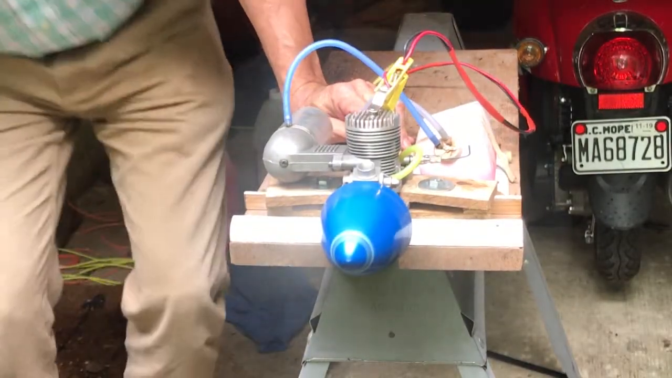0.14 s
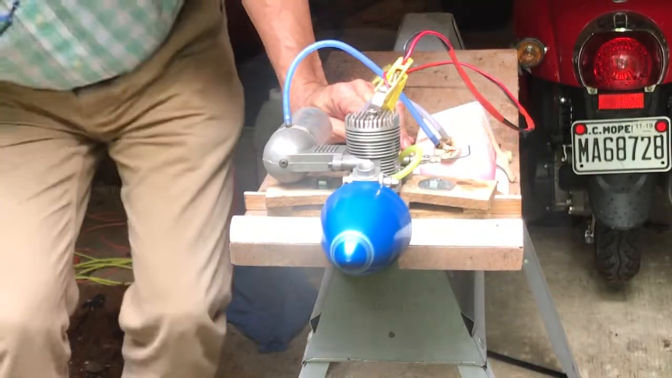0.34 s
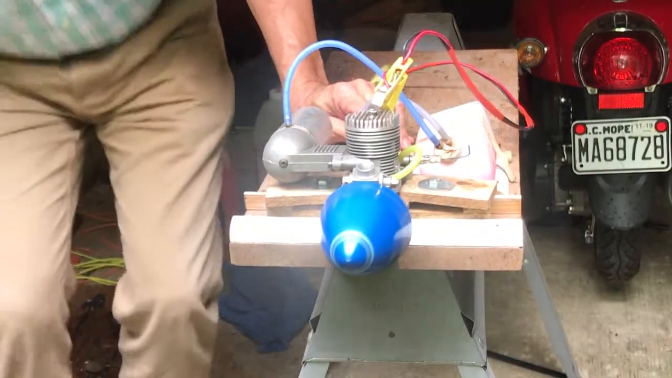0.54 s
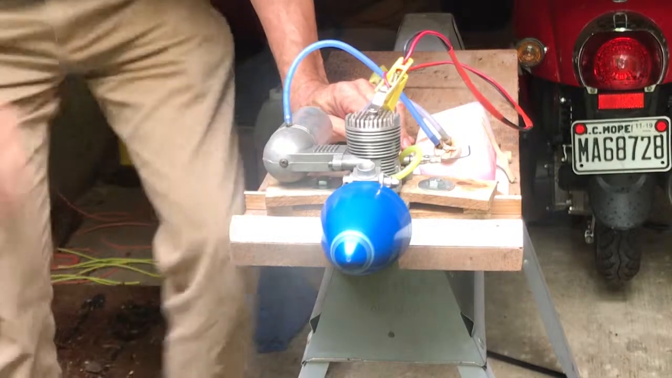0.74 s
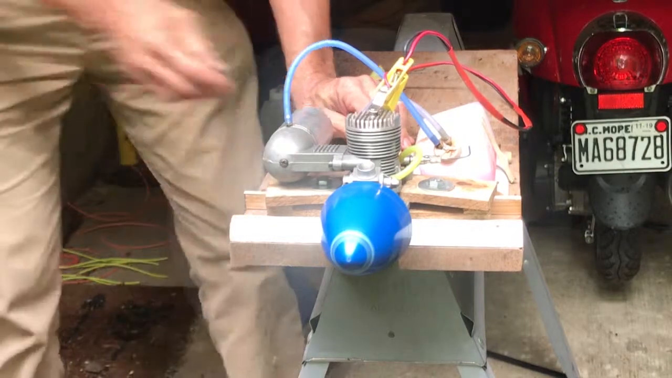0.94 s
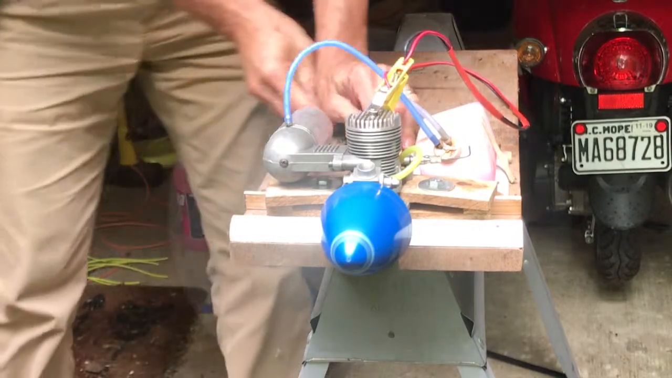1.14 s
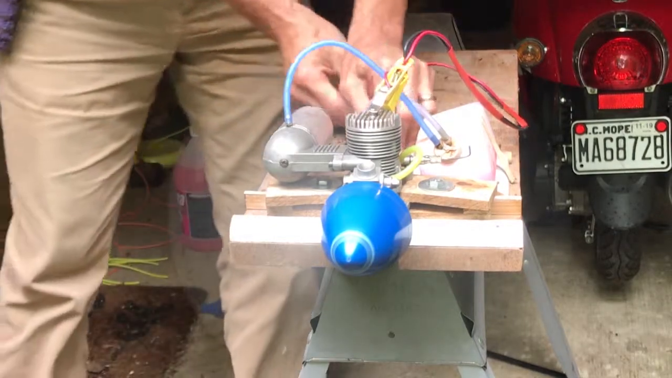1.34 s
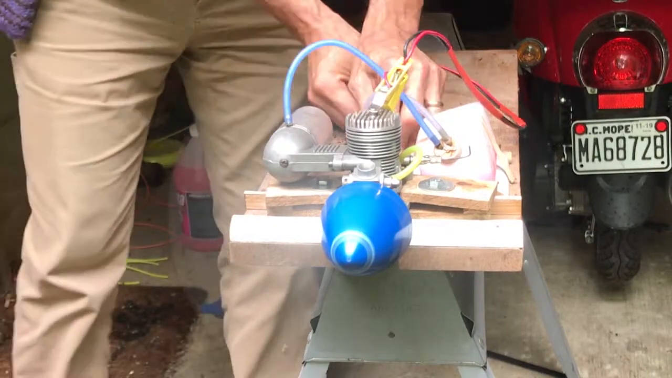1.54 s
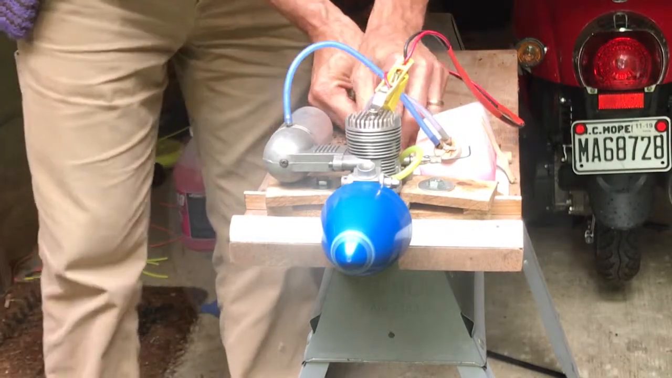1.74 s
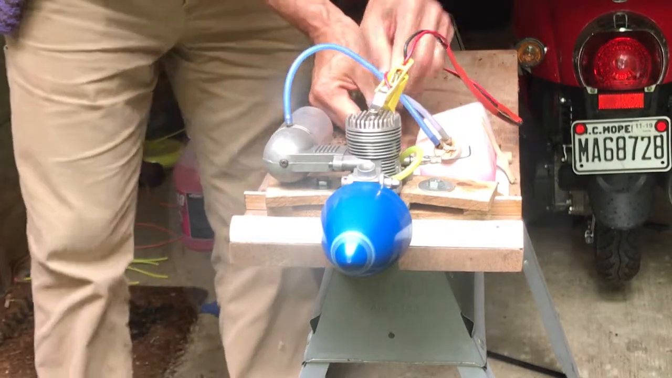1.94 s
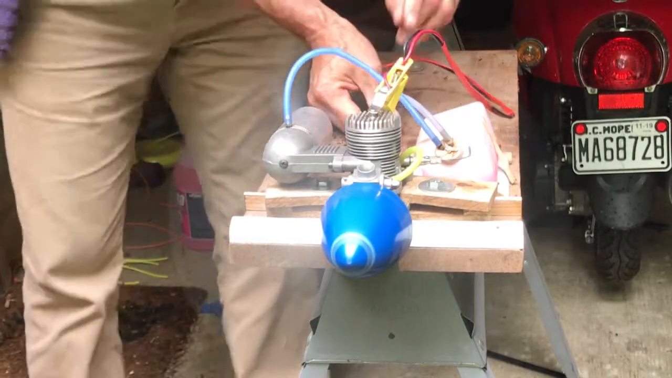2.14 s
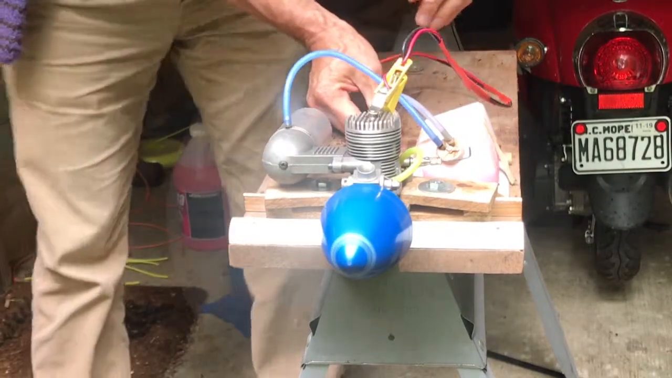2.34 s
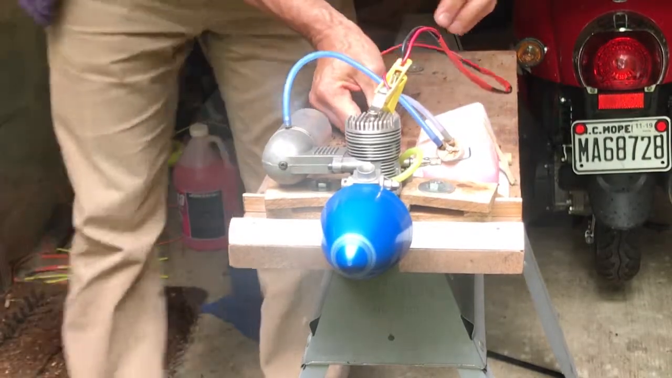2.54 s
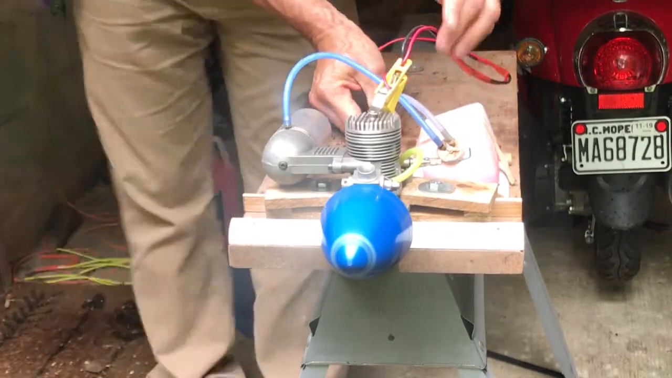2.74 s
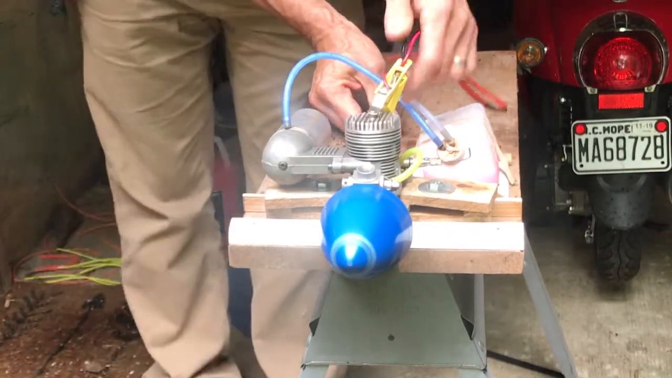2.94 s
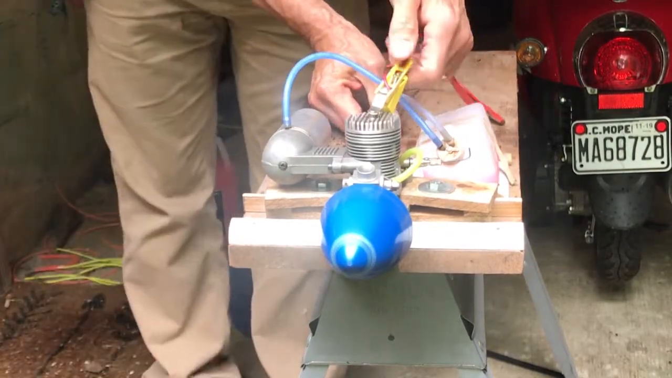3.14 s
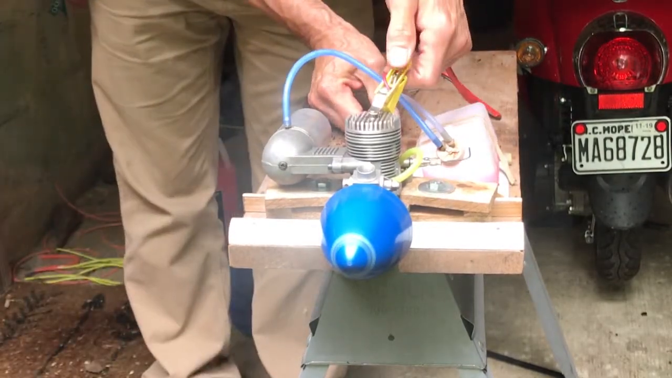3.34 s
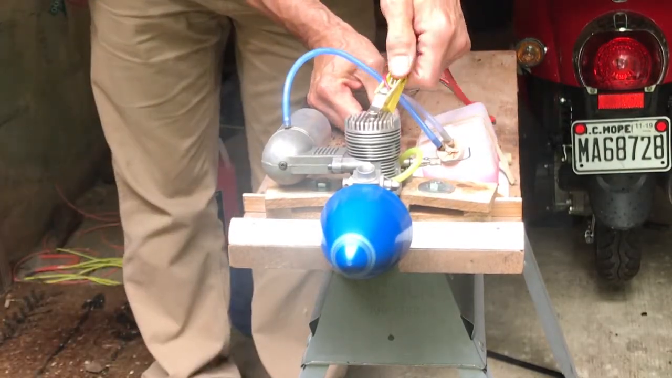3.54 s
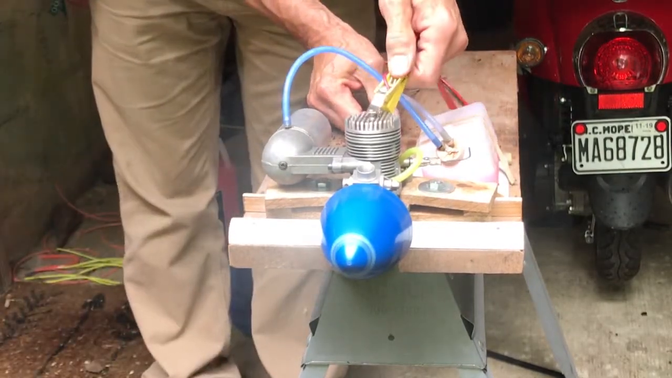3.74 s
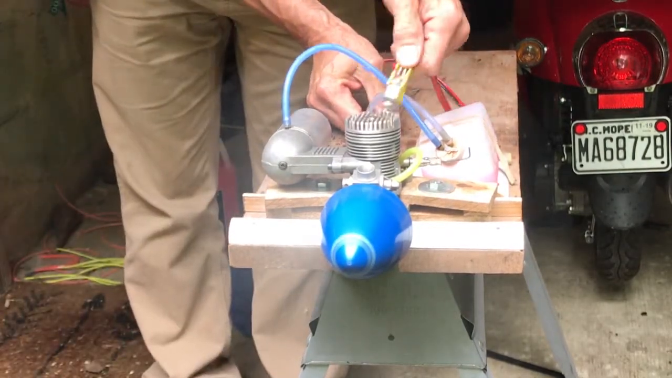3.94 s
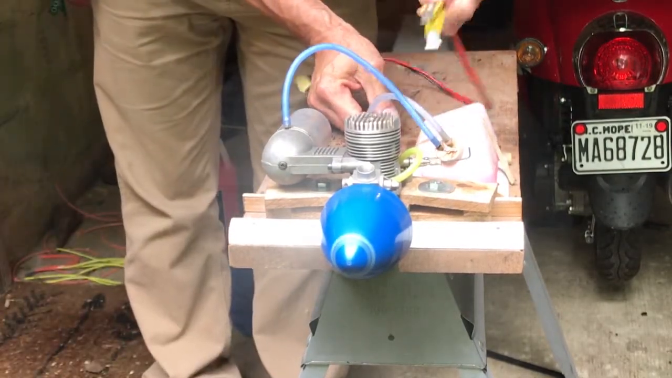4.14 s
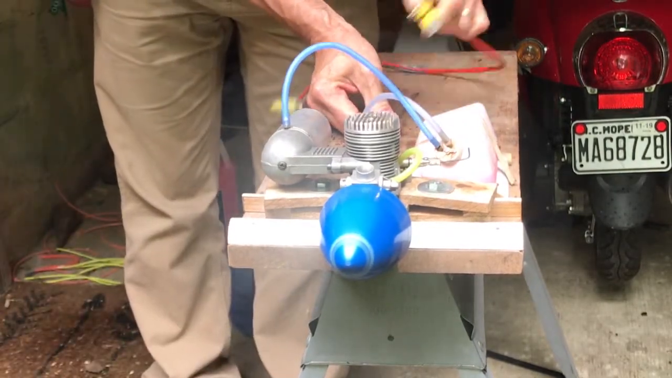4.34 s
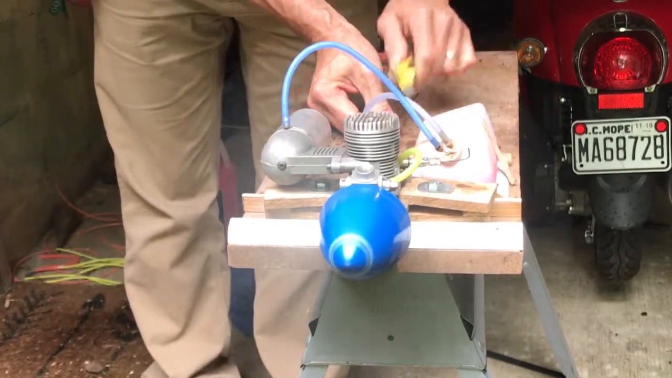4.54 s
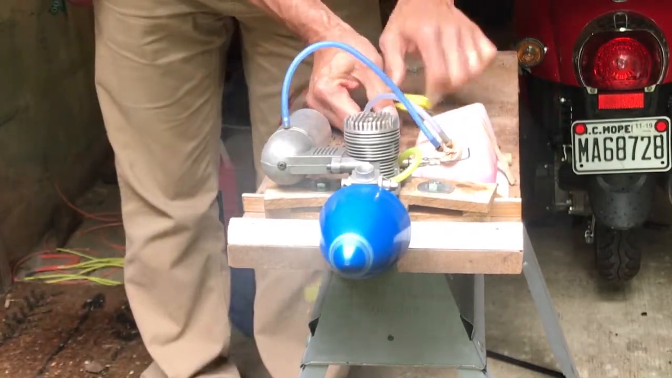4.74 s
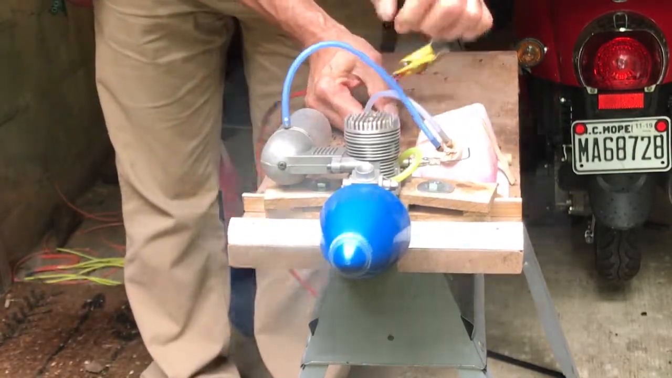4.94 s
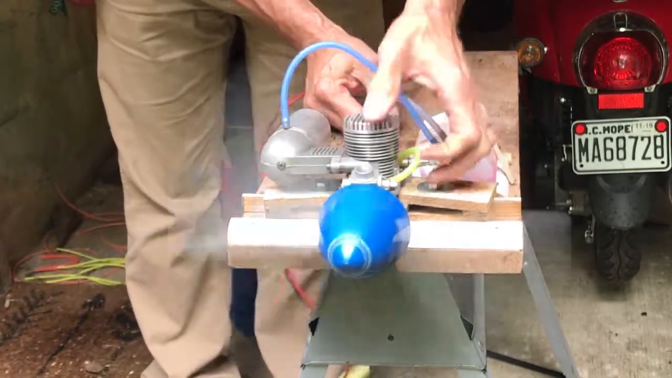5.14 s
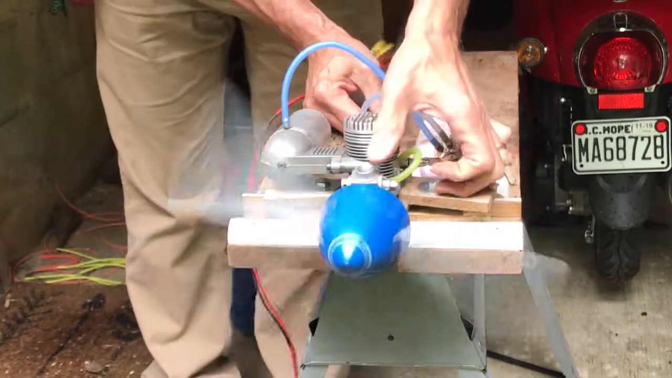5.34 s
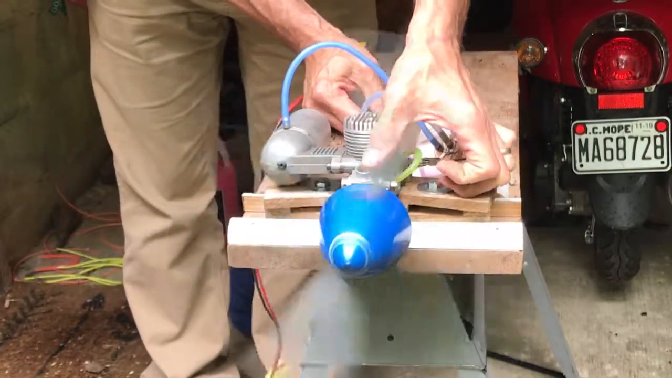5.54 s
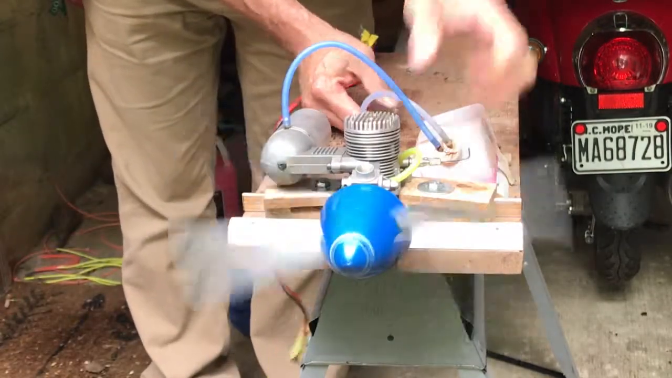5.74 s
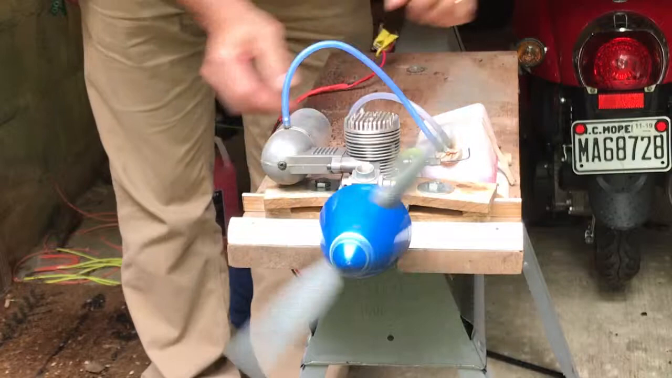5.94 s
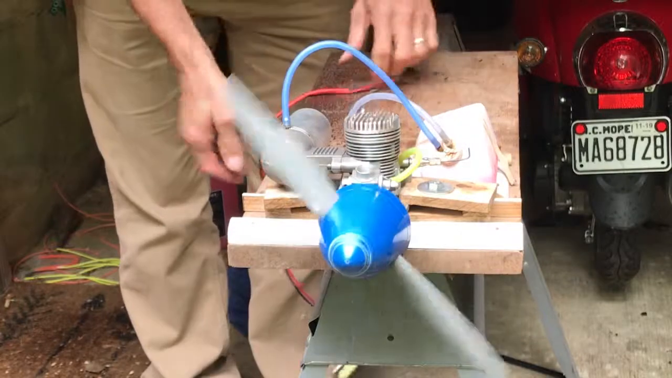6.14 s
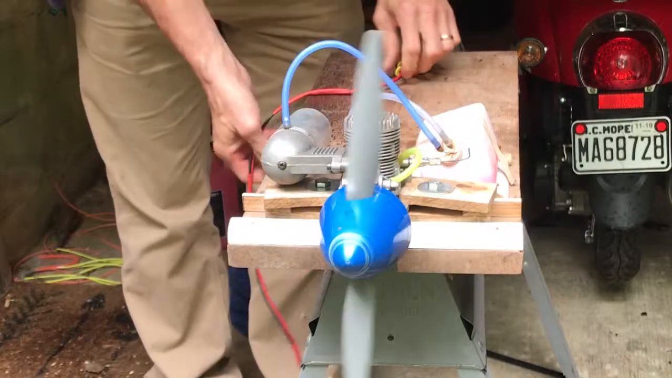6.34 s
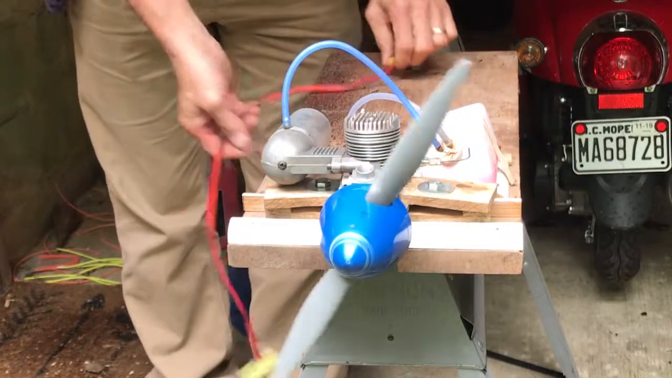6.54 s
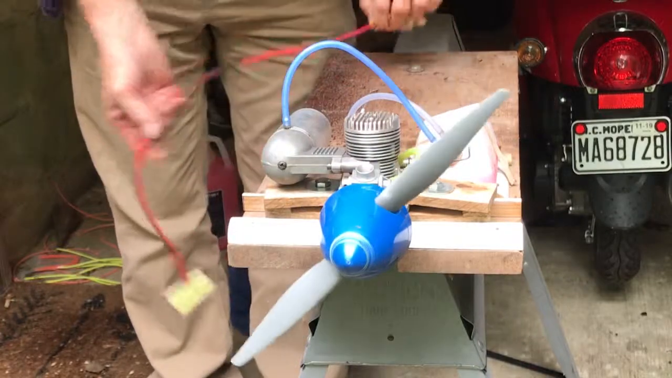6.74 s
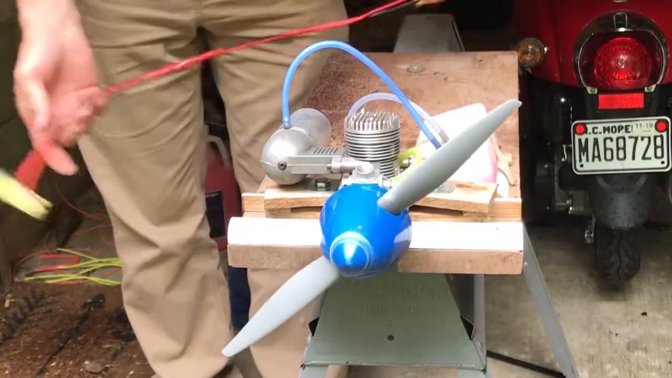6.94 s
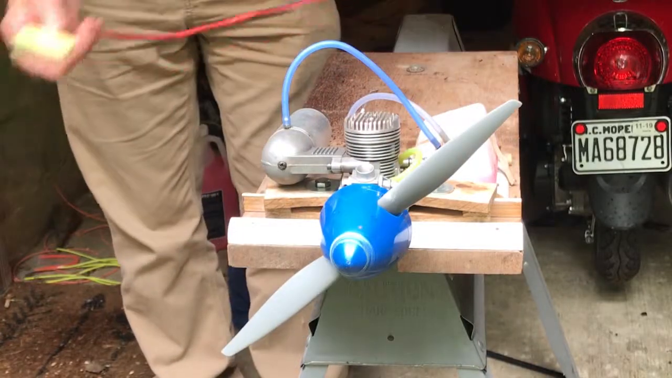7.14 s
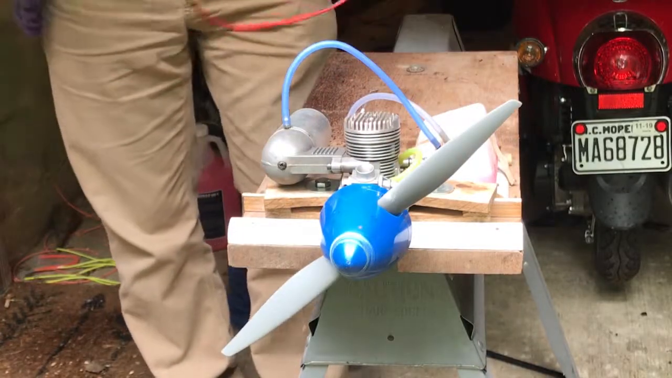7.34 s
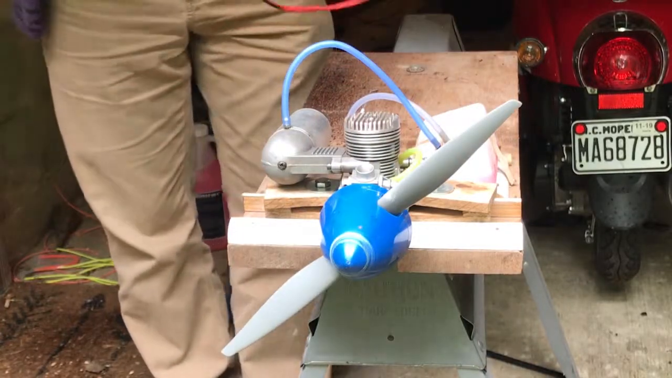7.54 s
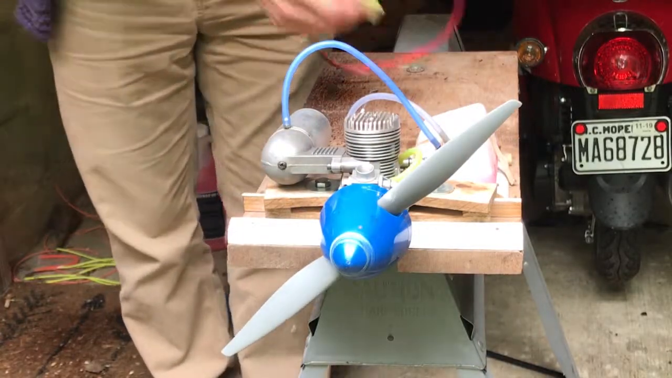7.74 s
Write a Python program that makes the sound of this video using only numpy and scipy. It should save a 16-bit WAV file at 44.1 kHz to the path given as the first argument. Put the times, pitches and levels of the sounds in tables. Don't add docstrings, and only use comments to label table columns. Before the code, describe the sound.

A tiny two-stroke propeller engine on a wooden stand runs loud and close at a garage door. Its raspy buzz holds with two early taps, climbs to a hissing whine, then slides down and loses fire. Breathy gasps and slowing compression thumps follow as it coasts to a stop. Clip and wire tick, something knocks on wood, cloth rustles, and faint birds chirp outside.

```python
import sys
import numpy as np
from scipy import signal
from scipy.fft import rfft, irfft
from scipy.io import wavfile
from scipy.ndimage import uniform_filter1d

SR = 44100
rng = np.random.default_rng(int(sys.argv[2]) if len(sys.argv) > 2 else 0)


def log_audio(samples):
    frames = np.atleast_2d(samples).T
    limited = np.clip(frames, -1, 1)
    pcm = np.round(limited * 32767).astype(np.int16)
    wavfile.write(sys.argv[1], SR, pcm)


def ratio(d):
    e = np.asarray(d, float) / 20
    return 10 ** e


N = 347508
T = np.arange(N) / SR


def evened(x, span=None):
    power = uniform_filter1d(x ** 2, span) if span else np.mean(x ** 2)
    return x / np.sqrt(abs(power) + 1e-20)


def curves(rows):
    s, *columns = np.transpose(rows)
    return [np.interp(T, s, c) for c in columns]


def read(points, hz):
    f, value = np.transpose(points)
    return np.interp(np.log(hz + 1), np.log(f + 1), value)


def add(mix, s, sound):
    part = mix[round(s * SR):][:len(sound)]
    part += sound[:len(part)]


def resonate(x, hz, width):
    turn = np.exp(2j * np.pi * np.cumsum(hz * np.ones(len(x))) / SR)
    r = np.exp(-np.pi * abs(width) / SR)
    return 2 * (turn * signal.lfilter([1 - r], [1, -r], x * turn.conj())).real


def body(x, modes, lift=0.936, dull_db=0.):
    out = 0
    for k, (hz, width, db) in enumerate(modes):
        gain = ratio(db - dull_db * np.log2(hz / 500))
        out = out + (-1) ** k * gain * resonate(x, hz * lift, width)
    return out


def band(x, hz, octaves):
    f = np.fft.rfftfreq(len(x), 1 / SR) + 1
    bell = np.exp(-.5 * (np.log2(f / hz) / octaves) ** 2)
    return evened(irfft(rfft(x) * bell, len(x)))


def highpass(x, hz):
    return signal.sosfilt(signal.butter(4, hz, "high", fs=SR, output="sos"), x)


def split(x, low_hz, high_hz):
    f, z = np.fft.rfftfreq(N, 1 / SR), rfft(x)
    low = 1 / (1 + (f / low_hz) ** 16)
    high = 1 / (1 + (high_hz / (f + 1)) ** 16)
    z *= f < 15850
    return [irfft(z * share, N) for share in (low, 1 - low - high, high)]


def garage(x, wet_db):
    # [f/Hz, t60/s]
    decay = [(200, 0.33), (700, 0.26), (1800, 0.11), (5000, 0.11), (12000, 0.027)]
    taps = np.zeros(SR // 2)
    at = np.arange(150, len(taps) - 20, 20)
    taps[at + rng.integers(0, 20, len(at))] = rng.choice([-1., 1.], len(at))
    hz, t, z = signal.stft(taps, SR, nperseg=256)
    fade = ratio(-60 * t / read(decay, hz)[:, None])
    tail = signal.istft(z * fade, SR, nperseg=256)[1]
    return x + ratio(wet_db) * signal.oaconvolve(x, tail / np.linalg.norm(tail))[:N]


def air():
    # [f/Hz, level/dB per Hz]
    colour = [(14, -40.5), (24, -15.5), (65, 2), (193, -17), (513, -27), (976, -26), (2140, -32.5),
              (2750, -28), (2990, -36.5), (3250, -29), (7730, -41), (14700, -41.5), (16000, -52)]
    level_db = -60
    frames, hz = N // 256 + 5, np.fft.rfftfreq(1024, 1 / SR)
    a, b, patches = rng.standard_normal((frames, 513, 3)).T
    patches = evened(uniform_filter1d(uniform_filter1d(patches, 12, 0), 14, 1))
    z = (a + 1j * b) * ratio(read(colour, hz)[:, None] + 1.5 * patches)
    return ratio(level_db) * evened(signal.istft(z, nperseg=1024, noverlap=768)[1][:N])


def birds():
    # [t/s, length/s, start f/Hz, end f/Hz, level/dB]
    calls = [
        (6.58, .2, 2740, 2780, -79),
        (6.95, .03, 3050, 3250, -73),
        (6.97, .13, 2640, 2760, -72),
        (7.08, .035, 3100, 3280, -75),
        (7.205, .05, 3180, 3270, -75),
        (7.33, .04, 3050, 3290, -72),
        (7.39, .1, 2650, 2720, -77),
        (7.46, .07, 3270, 3330, -73),
        (7.7, .04, 7000, 7300, -80),
        (7.81, .05, 4500, 4650, -78),
    ]
    out = np.zeros(N)
    for s, length, from_hz, to_hz, db in calls:
        n = round(length * SR)
        waver = 18 * evened(uniform_filter1d(rng.standard_normal(n), 200))
        hz = np.linspace(from_hz, to_hz, n) + waver
        whistle = np.sin(2 * np.pi * np.cumsum(hz) / SR)
        add(out, s, ratio(db) * whistle * signal.windows.tukey(n, .5))
    return ratio(2) * garage(out, -7)


def rustles():
    # [t/s, length/s, level/dB, centre f/Hz, width/octaves]
    slides = [(5.077, 0.041, -40, 2160, 0.47), (5.158, 0.04, -59, 6000, 1), (5.952, .26, -67.5, 1000, 0.98),
              (5.442, 0.045, -62, 6000, .7), (5.685, .03, -67, 8000, .6), (5.944, 0.13, -64, 3500, 0.76),
              (6.554, .1, -76.5, 3920, 1), (6.746, 0.27, -65.5, 6730, 1.4), (7.097, 0.082, -64, 8000, 2.5),
              (7.332, 0.22, -68, 3860, 0.79), (7.55, 0.11, -77, 4000, 1.1), (7.795, 0.14, -73.5, 9140, 1.6)]
    out = np.zeros(N)
    for s, length, db, hz, octaves in slides:
        n = round(length * SR)
        grit = rng.standard_normal((2, 12000))
        patchy = band(grit[0], hz, octaves) * ratio(1.8 * evened(uniform_filter1d(grit[1], 300)))
        add(out, s, ratio(db) * patchy[:n] * np.hanning(n))
    return out


def ticks_and_taps():
    # [t/s, peak level/dB, centre f/Hz]
    ticks = [(5.1344, -45, 6260), (5.155, -39, 6510), (5.4065, -43, 5800), (5.4464, -54, 6000),
             (5.2194, -46, 5430), (5.2719, -51, 8800), (5.3066, -47, 8590), (5.34, -54, 8800),
             (5.3787, -38.5, 5360), (5.425, -45.5, 5840), (5.5238, -50, 5380), (5.677, -44, 7000),
             (6.0206, -44.5, 5680), (6.1816, -43.5, 6360), (6.3594, -61.5, 5300), (6.6385, -42.5, 5360),
             (6.7187, -56.5, 6880), (6.982, -57, 6500), (7.1994, -60.5, 9100), (7.366, -56, 5350),
             (7.7033, -61, 7170)]
    # [t/s, peak level/dB, centre f/Hz, width/octaves]
    taps = [(.655, -16.5, 520, 0.82), (.692, -11, 635, 2.4), (5.1385, -26, 905, 0.26),
            (5.243, -31.5, 1460, 0.34), (5.4144, -36, 864, 0.78), (5.596, -45, 900, 0.63),
            (5.446, -36, 1020, .65), (5.474, -38, 2680, 0.46), (5.9675, -37.5, 2590, 1.1),
            (5.979, -41, 2300, 0.74), (6.181, -44.5, 600, 0.61), (6.442, -50, 1870, .6),
            (6.569, -53, 2710, 1.1), (7.5941, -50, 920, 1.3), (7.6084, -44, 1840, 1.35),
            (7.7725, -53.5, 1220, 2.4), (7.8754, -42, 1116, 0.57)]
    snap_s = .0035
    out, t = np.zeros(N), T[:12000]
    hits = [(*row, 0.78, 0.27, -18.5) for row in ticks] + [(*row, 0.17, -4.5) for row in taps]
    for (s, db, hz, octaves, t60, tail_db), grit in zip(hits, rng.standard_normal((40, 12000))):
        fade = np.exp(-t / snap_s) + ratio(tail_db - 60 * t / t60)
        add(out, s, ratio(db - 11) * band(grit, hz, octaves) * fade)
    return out


def clip_knock():
    # [t/s, peak level/dB]
    blows = [
        (6.288, -21.5),
    ]
    # [f/Hz, level/dB, t60/s]
    knock_modes = [(413, -12.5, .3), (553, -14, 1.8), (690, -11, .1), (570, -27, .3), (1024, 3, 0.16),
                   (1640, 5, 0.04), (1870, 1, 0.24), (2400, 3, 0.047), (2990, 15.5, 0.011),
                   (3420, -16.5, 0.1), (3770, -26.5, 0.094), (4570, -7, 0.13), (5039, -18, 0.1)]
    out, t = np.zeros(N), T[:12000]
    modes = np.zeros(len(t))
    for hz, db, t60 in knock_modes:
        damped_t60 = .24 if hz < 600 else min(t60, .04)
        modes += ratio(db - 60 * t / damped_t60) * np.sin(2 * np.pi * hz * t)
    crack = band(rng.standard_normal(12000), 2400, .65) * (np.exp(-t / .002) + ratio(-10 - 60 * t / .19))
    strike = (modes + 1.6 * crack) * (1 - np.exp(-t / .0003))
    s, peak_db = blows[0]
    for delay, db in [(0, -11), (.0035, -3)]:
        add(out, s + delay, ratio(peak_db + db - 13) * strike)
    return garage(out, -8.0)


def coasting():
    # [t/s, peak level/dB, length/s]
    gasp_rows = [(4.726, -26, 0.008), (4.746, -22, 0.0086), (4.769, -15, 0.0071), (4.791, -19, 0.01),
                 (4.818, -18, 0.009), (4.843, -20, 0.014), (4.872, -20, 0.015), (4.908, -21.5, 0.015),
                 (4.945, -30, 0.012), (4.977, -34, 0.0097), (5.015, -51, 0.016), (5.062, -58, 0.022),
                 (5.153, -44, 0.042)]
    # [t/s, peak level/dB,
    # f/Hz, ring of the stand/dB]
    thump_rows = [(0.691, -21.5, 225, -23), (4.643, -31, 260, -27), (4.68, -30, 250, -25),
                  (4.696, -30, 262, -25), (4.717, -23, 280, -27), (4.761, -27, 230, -28),
                  (4.785, -33, 250, -25), (4.809, -30, 250, -25), (4.836, -28, 250, -23),
                  (4.866, -27, 264, -28), (4.896, -27, 259, -26), (4.932, -29, 264, -26),
                  (4.973, -29, 247, -26), (5.026, -32, 235, -10), (5.101, -35, 175, -23),
                  (5.178, -38, 200, -13), (5.258, -37.5, 257, -10.5), (5.353, -36, 233, -23),
                  (5.459, -38, 205, -7), (5.595, -43.5, 197, -14), (5.747, -45.5, 199, -11),
                  (5.942, -48, 192, -12.5)]
    # [f/Hz, width/Hz, level/dB]
    venturi = [(6200, 350, 2), (7900, 500, 0), (11800, 1500, -3), (9500, 5000, -13)]
    push_s = .0034
    gasps, out, t = np.zeros(N), np.zeros(N), T[:12000]
    shake = evened(body(rng.standard_normal(N), [(575, 25, -1.5), (905, 65, -11.5)]))
    for s, db, length in gasp_rows:
        add(gasps, s, ratio(db - 7.5) * np.hanning(round(length * SR)))
    for s, db, hz, ring_db in thump_rows:
        push = t / push_s * np.exp(1 - t / push_s) * np.sin(2 * np.pi * hz * t)
        swell = ratio(ring_db - 60 * t / 0.49) * (1 - np.exp(-t / 0.0043))
        ring = swell * shake[round(s * SR):][:len(t)]
        add(out, s, ratio(db) * (push + ring))
    return garage(out + gasps * evened(body(rng.standard_normal(N), venturi)), -20)


def controls():
    # [t/s, speed/turns per s]
    shaft = [(0.0, 112.6), (0.58, 119.0), (0.91, 117.2), (1.1, 122.2), (1.34, 111.2), (1.43, 109.2),
             (1.65, 108.5), (1.74, 118.7), (2.13, 159.7), (2.23, 165.8), (2.64, 173.3), (2.88, 173.7),
             (3.22, 162.9), (3.99, 117.1), (4.22, 101.9), (4.31, 92.1), (4.44, 84.1), (4.5, 85.0)]
    # [t/s, level/dB, dulling of the gas hiss as the mixture richens or starves/dB]
    loudness = [(0, -23, 1), (1.2, -24.5, -0.5), (1.74, -22, 1.5), (2.2, -25, -5), (2.52, -26.5, -2.5),
                (2.9, -24.5, -1.5), (3.36, -26, -3.5), (3.42, -27.5, -1.5), (3.53, -25, -3.5),
                (3.65, -26, -1), (4.2, -27.5, 0.5), (4.51, -24.5, 4.5), (4.7, -27, 6.5), (4.94, -30, 11.5),
                (5.05, -35, 20), (5.15, -48, 18.5), (5.37, -58, 27), (6, -69.5, 43)]
    # [t/s, firing/0-1]
    burn = [(0, 1), (1.6, 1), (2.6, 1), (3.6, 1), (4.1, .97), (4.3, .83), (4.45, .93), (4.52, .88),
            (4.56, .2), (4.63, 0)]
    # [t/s, length/s, rise/dB]
    drags = [
        (5.12, 0.18, 7.5),
        (5.366, 0.18, 7.5),
        (5.522, 0.036, 5),
        (5.677, 0.078, 11),
    ]
    surge_db = [.4, .9, 1.3]
    coast_s = .42
    out_s = shaft[-1][0]
    speed = uniform_filter1d(curves(shaft)[0], size=2500) * np.exp(-np.maximum(T - out_s, 0) / coast_s)
    level_db, dull_db = curves(loudness)
    surge = evened(uniform_filter1d(uniform_filter1d(rng.standard_normal(N), 1500), 1500))
    for s, length, db in drags:
        add(level_db, s, db * signal.windows.tukey(round(length * SR), .7))
    ring_db = level_db - 1 - 0.54 * dull_db
    layers_db = [level_db, ring_db, level_db - dull_db]
    return speed, curves(burn)[0], [db + depth * surge for db, depth in zip(layers_db, surge_db)]


def pulses(turns, speed):
    strokes = [(0, 0.32, 0.0032), (0.075, -0.68, 0.015), (0.142, 0.7, 0.012), (0.293, 0.063, .006),
               (.5, 0.51, 0.0085), (0.639, -0.68, .006), (0.812, 0.71, 0.019)]
    steps = []
    for (at, strength, wander), start in zip(strokes, rng.random(len(strokes))):
        drift = wander * np.sin(2 * np.pi * (start + T * (.2 + .3 * start)))
        z = np.exp(2j * np.pi * (turns - at - drift) - speed / 4000)
        steps.append(strength * (z ** 4 / (1 - z)).real)
    return np.array(steps) * np.sqrt(4 * speed / SR / np.sum(np.transpose(strokes)[1] ** 2))


def chamber(port, turns, levels_db):
    # f/Hz, width/Hz, level under the bark/dB, gain/dB per dB of dulling
    first_mode = (1247.5, 167, -1.5, 0.5)
    # [t/s, length/s, f/Hz, level/dB]
    flares = [(0, .2, 2920, -31), (.15, 1.15, 1185, -29), (.85, .45, 1190, -29), (0, 1.3, 945, -38),
              (.6, .6, 1660, -33), (1.3, .65, 545, -29), (4.26, .1, 1230, -29), (.1, 1.2, 1295, -28),
              (2.2, 1, 2380, -32), (.2, 1, 2960, -35), (1.85, .2, 1540, -29), (0, .4, 5470, -29),
              (.2, .7, 5475, -30), (.76, .48, 5500, -28), (1.26, .3, 5360, -30), (1.1, .6, 4150, -35),
              (1.17, .45, 2855, -29), (1.8, .55, 3070, -25), (2.2, 1, 3110, -29), (3.1, .65, 3070, -31),
              (1.75, .4, 4370, -33), (2.08, 1, 4500, -34), (2.15, 1.2, 4640, -36), (3.25, .65, 4360, -35),
              (1.6, .6, 5700, -35), (2.08, .5, 5820, -32), (2.3, .8, 5900, -36), (2.15, 1.2, 6060, -36),
              (2.9, .5, 5790, -33), (3.3, .55, 5680, -31), (3.7, .45, 5560, -36), (1.8, 1.1, 7170, -35),
              (1.75, 1.1, 8490, -34), (3, .7, 8420, -38)]
    hz, width, db, gain_db = first_mode
    ring = evened(resonate(resonate(port, hz, width), hz, 2 * width), 6000)
    out = ring * ratio(levels_db[0] + db + gain_db * np.clip(levels_db[0] - levels_db[2], -6, 4))
    z = .99 * np.exp(2j * np.pi * turns)
    beat = (z / (1 - z)).real
    for s, length, hz, db in flares:
        part = beat[round(max(s, 0) * SR):][:round(length * SR)]
        width = 20 + hz / 70
        flare = evened(resonate(resonate(part, hz, width), hz, width), 9000)
        add(out, max(s, 0), ratio(db) * flare * signal.windows.tukey(len(part), .5))
    return out


def clean_orders(speed, turns, late):
    # [f/Hz, level/dB]
    shaft_tone, blade_tone = [(55, -47), (85, -49), (107, -35), (114.5, -43.5), (120, -39), (145, -29.5),
                              (162, -53), (171, -41.5)], [(120, -38.5), (170, -27.5), (185, -39.5), (217, -28.5),
                                                  (230, -33), (243, -26), (325, -30.5), (345, -22.5)]
    blow_tone, port_tone = [(200, -42), (255, -24), (330, -38), (364, -45.5), (410, -37.5), (480, -45.5),
                            (505, -52.5), (520, -34.5)], [(400, -38.5), (470, -71), (545, -45), (600, -51.5),
                                               (690, -47.5), (750, -44.5), (830, -39), (870, -46.5)]
    pull_gains = [0.027, 0.0315, 0.084, .01, 0.013]
    # [multiple of the shaft, level/dB]
    whine = [
        (7, -42),
        (14, -27.5),
    ]
    pull = np.clip(uniform_filter1d(np.gradient(speed) * SR, 8000), -60, 120)
    still_db = -3 * np.maximum(43 - speed, 0)
    out = np.zeros(N)
    tones = [shaft_tone, blade_tone, blow_tone, port_tone, port_tone]
    for k, (tone, pull_db) in enumerate(zip(tones, pull_gains), 1):
        db = read(tone, k * speed) + pull_db * pull + still_db
        out += np.sqrt(2) * ratio(db) * np.cos(2 * np.pi * k * turns)
    for k, db in whine:
        out += np.sqrt(2) * ratio(db) / (1 + (164 / speed) ** 60) * np.cos(2 * np.pi * k * late)
    return out


def engine():
    # [t/s, fourth mode f/Hz]
    heat = [(0.0, 5590), (1.12, 5560), (1.3, 5430), (1.55, 5460), (1.75, 5620), (2.28, 5850), (3.0, 5870),
            (3.7, 5700), (4.4, 5410)]
    # [f/Hz, width/Hz, level/dB]
    muffler = [(480, 410, -18.5), (1226, 210, -5), (1460, 467, -7.5), (2260, 310, -11.5), (2922, 280, -10),
               (3360, 200, -11.5), (4220, 300, -7.5), (5454, 290, -2.5), (6580, 1000, -11), (6770, 30, 3.5),
               (8054, 730, -6.5), (9400, 490, -4.5), (10980, 930, -9.5), (12400, 1300, -9),
               (15200, 3300, -14)]
    # [f/Hz, width/Hz, level/dB]
    stand = [(210, 41, -1.5), (579, 42, -3.5), (900, 330, -0.5), (1240, 550, -3), (1480, 120, 1),
             (2080, 560, -13.5), (3400, 490, -7.5), (8000, 15000, -20), (415, 120, -6)]
    speed, firing, levels_db = controls()
    gas, scatter = .4 + .6 * np.sqrt(1 - firing), .002 + .018 * (1 - firing)
    turns = np.cumsum(speed) / SR
    early, strong = (np.interp(turns, np.arange(900), c) for c in rng.standard_normal((900, 2)).T)
    late = turns - scatter * early
    steps = pulses(late, speed) * ratio(.8 * strong)
    blow = steps.sum(axis=0)
    lift = curves(heat)[0] / 5490
    gate = 0.84 + np.exp(-(late % 1) / 0.19)
    noise = rng.standard_normal((3, N))
    pipe = body(blow + gas * evened(gate * noise[0]), muffler, lift)
    lumps = ratio(1.5 * evened(uniform_filter1d(noise[2], 300))) * (1.2 + np.cos(np.pi * turns) ** 8)
    spin = np.clip(speed / 60, 0, 1)
    rattle = body(spin * blow + .5 * noise[1] * lumps, stand, dull_db=9 * (1 - spin) ** 4)
    source = firing * evened(pipe, 8000) + (1 - 0.85 * firing) * evened(rattle, 8000)
    bands = split(highpass(garage(source, -10), 200), 2000, 4000)
    out = sum(ratio(db) * evened(x, 6000) for db, x in zip(levels_db, bands))
    out += firing ** 2 * chamber(steps[0], turns - .25 * scatter * early, levels_db)
    out += band(noise[1], 110, 0.8) * ratio(levels_db[0] - 16.5 - 7.9 * firing)
    return out + clean_orders(speed, turns, late)


def scene():
    handling = rustles() + ticks_and_taps() + clip_knock()
    return (air() + birds() + handling + coasting() + engine())[None]


def roll_off(x):
    return signal.sosfilt(signal.butter(12, 16680, fs=SR, output="sos"), x)


def record(dry):
    ceiling, edge_hz = .85, 16250
    edge = signal.firwin(401, edge_hz, window=("kaiser", 9), fs=SR)
    rounded = dry / (1 + (dry / ceiling) ** 4) ** 0.2
    return roll_off(signal.oaconvolve(rounded, edge[None], "same"))


dry = scene()
out = record(dry)
log_audio(out)
```